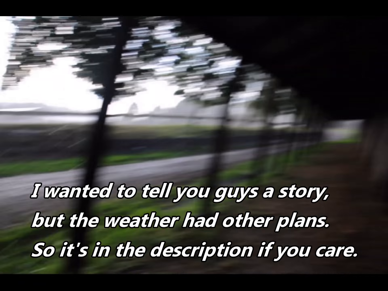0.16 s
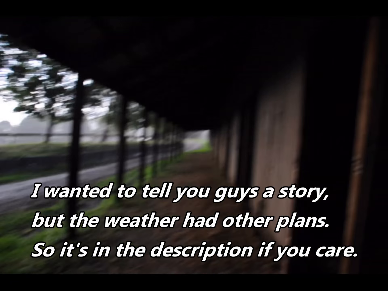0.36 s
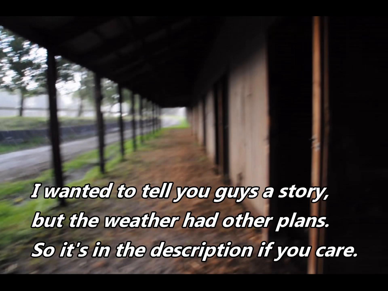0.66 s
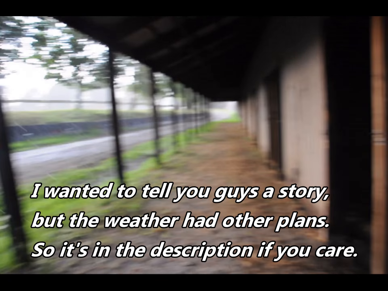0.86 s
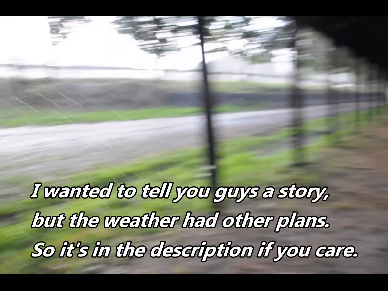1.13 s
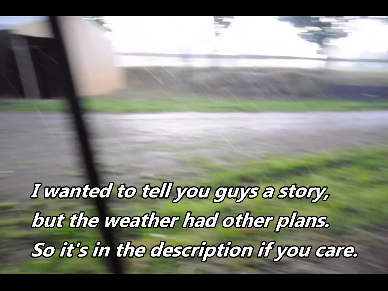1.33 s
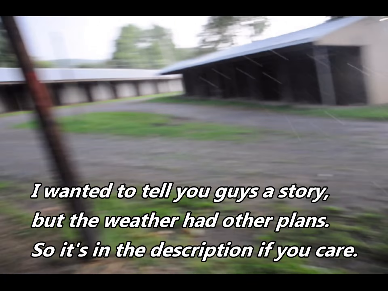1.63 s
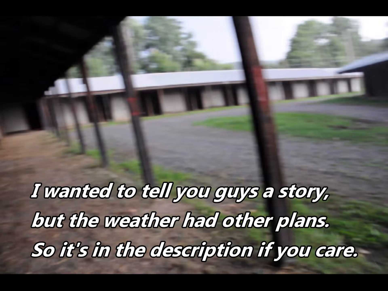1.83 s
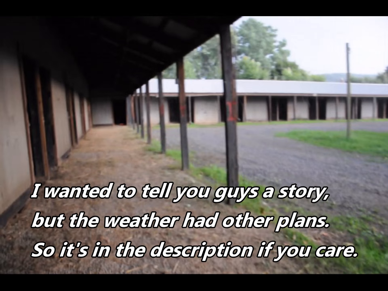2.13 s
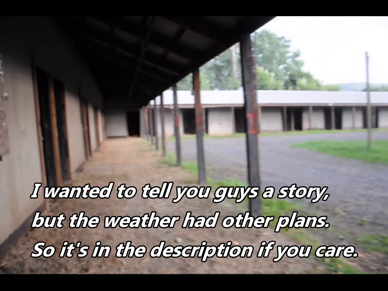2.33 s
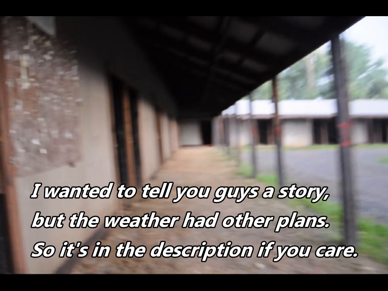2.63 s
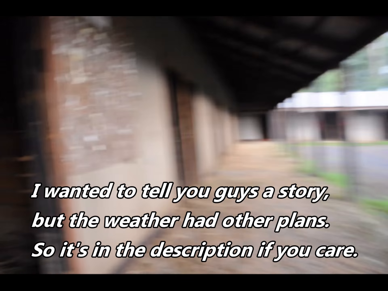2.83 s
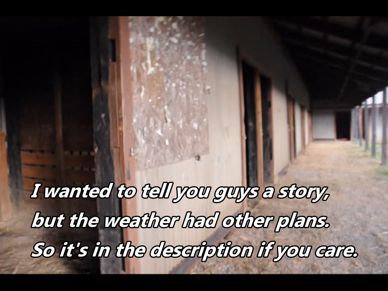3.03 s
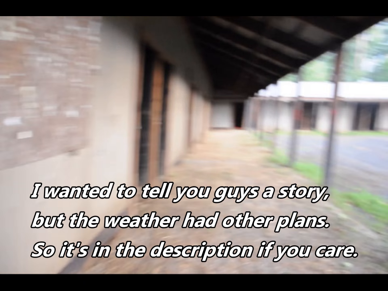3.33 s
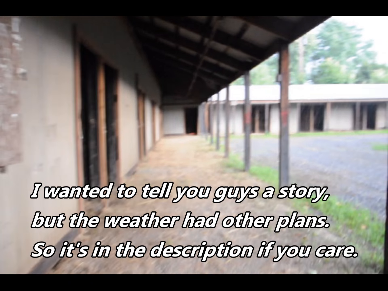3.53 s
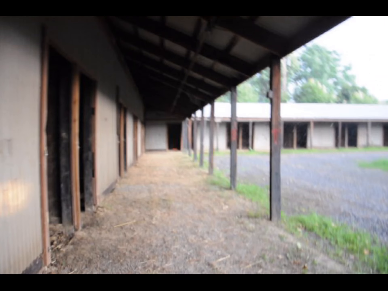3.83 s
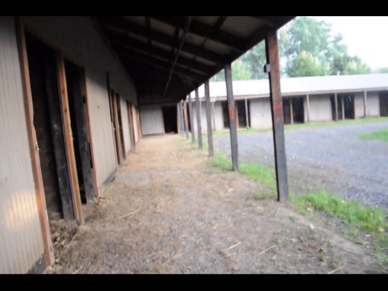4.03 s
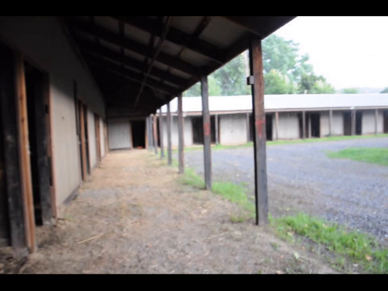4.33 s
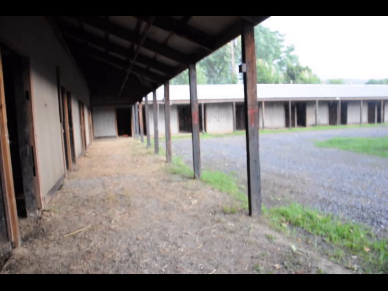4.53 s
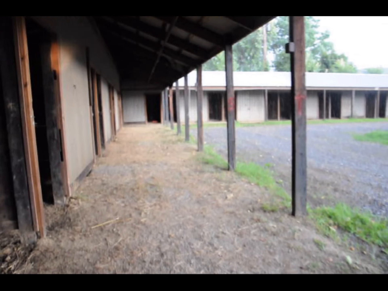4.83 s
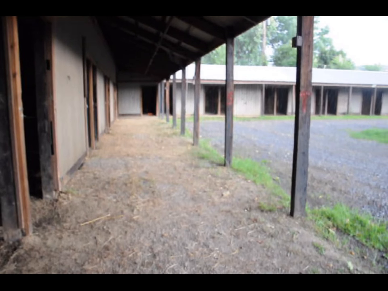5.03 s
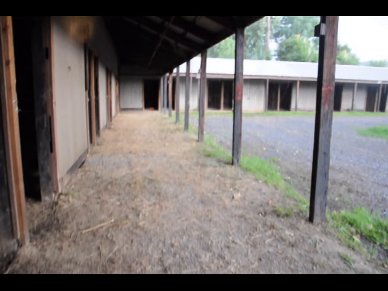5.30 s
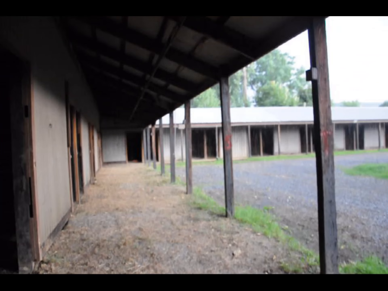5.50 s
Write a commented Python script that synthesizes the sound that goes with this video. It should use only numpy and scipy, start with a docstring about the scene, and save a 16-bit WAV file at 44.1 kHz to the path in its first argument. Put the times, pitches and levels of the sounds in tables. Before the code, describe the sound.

Heavy rain drums on a sheet-metal roof in a dense, loud, steady roar, with knocking drops and wet run-off spattering on the ground nearby.

```python
"""Under the sheet-metal roof of an open shed row, in heavy rain.
Dense random impacts drum the sheets into a roar over a low boom of air; single drops knock as damped modes.
Run-off spatters on the ground by the eaves as filtered noise, with heavier splats as short bursts of spray.
Slow sampling, softly smoothed, mirrors the treble above half its rate."""
import sys
import numpy as np
from scipy import signal
from scipy.fft import rfft, irfft, next_fast_len
from scipy.io import wavfile
from scipy.ndimage import uniform_filter1d, map_coordinates

SR = 44100
rng = np.random.default_rng(int(sys.argv[2]) if len(sys.argv) > 2 else 0)


def output_pcm(signal):
    """Save a mono or channel-first signal as 16-bit PCM at the path in sys.argv[1].

    Samples are clipped to [-1, 1] before scaling.
    """
    pcm = np.clip(np.atleast_2d(signal).T, -1, 1) * 32767
    wavfile.write(sys.argv[1], SR, np.round(pcm).astype(np.int16))


N = 249606  # length in samples


def amp(db):
    """Decibel law: amplitude ratio of a level in dB."""
    return 10 ** (np.asarray(db) / 20)


def unit(x):
    """Normalisation to an rms of one."""
    return x / np.sqrt(np.mean(x ** 2) + 1e-20)


def along(points, hz):
    """Interpolation of (frequency, value) points on a logarithmic frequency axis."""
    point_hz, value = np.transpose(points)
    return np.interp(np.log(hz + 1), np.log(point_hz + 1), value)


def curves(rows):
    """Linear interpolation in time: one value per sample for each column after start_s."""
    start_s, *columns = np.transpose(rows)
    return [np.interp(np.arange(N) / SR, start_s, column) for column in columns]


def wobble(rate_hz):
    """Band-limited fluctuation: a smooth curve through rate_hz random knots a second."""
    knots = rng.standard_normal(N // 100)
    return map_coordinates(knots, [np.arange(N) * rate_hz / SR])


def filtered(x, response):
    """Linear filtering: the spectrum is multiplied by a response of frequency."""
    padded = next_fast_len(N + SR // 2)
    hz = np.fft.rfftfreq(padded, 1 / SR)
    return irfft(rfft(x, padded) * response(hz), padded)[..., :N]


def coloured(x, spectrum):
    """Spectral shaping by a source's frequency response, at unit rms."""
    return unit(filtered(x, lambda hz: amp(along(spectrum, hz))))


def patchy(x, depth_db):
    """Uneven excitation: random gain in patches of time and pitch, as some sheets get more rain."""
    z = signal.stft(x, nperseg=512)[2]
    field = uniform_filter1d(rng.standard_normal(z.shape), size=5, axis=0)  # over pitch
    field = uniform_filter1d(field, size=8, axis=1)  # over time
    return signal.istft(z * amp(depth_db * unit(field)), nperseg=512)[1][:N]


RAREST = .004  # drops have a largest size, reached by this share of them


def drop_db(size, spread_db):
    """Power-law size distribution: few drops are large, and the largest size is capped."""
    return -spread_db * np.log(np.maximum(size, RAREST))


def drops(count, spread_db, ring_s, wash):
    """Shot noise: unequal random impacts ring as decaying noise, over the steady wash of far drops."""
    when, size = rng.random((count, 2)).T
    impacts = np.bincount((when * N).astype(int), amp(2 * drop_db(size, spread_db)), N)
    t = np.arange(SR // 8) / SR
    decay = amp(-120 * t / ring_s)  # energy falls 60 dB in ring_s
    energy = np.abs(signal.fftconvolve(impacts, decay)[:N])
    share = np.clip(wash, 0, 1)
    envelope = np.sqrt(share + (1 - share) * energy / energy.mean())
    return envelope * rng.standard_normal(N)


# Response of the air under the roof: frequency_hz [Hz], level_db [dB, relative]
AIR_RESPONSE = [(20, -33), (57, -31), (70, -21), (80, -21), (100, -15), (190, -3.5), (270, -3.5),
                (370, 0.5), (600, -4), (1000, -17.5), (2000, -50)]


def boom():
    """Cavity response: the air under the roof shapes broad noise into a low boom."""
    return coloured(patchy(rng.standard_normal(N), depth_db=1.1), AIR_RESPONSE)


# Response of the struck sheets: frequency_hz [Hz], level_db [dB, relative]
SHEET_RESPONSE = [(200, -47.5), (500, -10), (640, -8.5), (740, -1.5), (1000, -2.5), (1430, -2.5),
                  (1650, -4), (2000, -4.5), (2800, -9), (4000, -17), (6000, -38.5)]


def drumming():
    """Superposed plate impacts: dense drops excite the sheets and merge into a roar."""
    impacts = drops(count=4000, spread_db=2.0, ring_s=0.062, wash=0.69)
    return coloured(patchy(impacts, depth_db=0.65), SHEET_RESPONSE)


# Bare impact of a near drop: frequency_hz [Hz], level_db [dB, relative]
TICK_SPECTRUM = [(400, -24), (900, 3.5), (1500, 1), (2500, -4), (4000, -4), (5600, -12.5)]


def ticks():
    """Impulsive contact: near drops give very short broadband clicks."""
    return coloured(drops(count=6000, spread_db=1.4, ring_s=.004, wash=0.056), TICK_SPECTRUM)


KNOCK_T60_S, KNOCK_RISE_S = .05, 0.0027  # 60 dB decay time, rise time constant
KNOCK_MODES, KNOCK_SCATTER = 3, .1  # modes per knock, their relative scatter in pitch


def ring_sheet(start_s, level_db, pitch_hz):
    """Modal decay: each drop sets a patch of sheet ringing briefly in a few close, clashing modes."""
    t = np.arange(SR // 25) / SR
    shape = amp(-60 * t / KNOCK_T60_S) * (1 - np.exp(-t / KNOCK_RISE_S))
    scatter = KNOCK_SCATTER * rng.standard_normal((len(pitch_hz), KNOCK_MODES))
    modes_hz = pitch_hz[:, None] * (1 + scatter)
    ring = sum(np.sin(2 * np.pi * mode[:, None] * t) for mode in modes_hz.T) / np.sqrt(KNOCK_MODES)
    struck = amp(level_db)[:, None] * shape / shape.max() * ring
    at = (start_s * SR).astype(int)[:, None] + np.arange(len(t))
    return np.bincount(at.ravel(), struck.ravel(), N + SR)[:N]


PATTER_HZ, PATTER_OCTAVES, PATTER_SPREAD_DB = 1020.3, 0.3286, 1  # usual pitch, its scatter, spread of size


def patter(count):
    """Random modal excitation: the nearest sheets knock at random times and pitches."""
    when, size = rng.random((count, 2)).T
    pitch_hz = PATTER_HZ * 2 ** (PATTER_OCTAVES * rng.standard_normal(count))
    return unit(ring_sheet(when * N / SR, drop_db(size, PATTER_SPREAD_DB), pitch_hz))


# Drops on wet ground: frequency_hz [Hz], level_db [dB, relative]
GROUND_SPECTRUM = [(800, -34.5), (2000, -8.5), (2800, -7.5), (3150, 0.5), (4000, -3), (5000, -6.5),
                   (5600, -13)]


def spatter():
    """Liquid impact noise: run-off strikes the wet ground as short, bright grains."""
    impacts = drops(count=9000, spread_db=2.5, ring_s=0.012, wash=0.6)
    return coloured(patchy(impacts, depth_db=0.5), GROUND_SPECTRUM)


# Slow levels of the shower: start_s [s], boom_db [dB], drumming_db [dB], patter_db [dB], spatter_db [dB]
SHOWER_LEVELS = [(0, -26.5, -25, -30, -25.5), (.15, -31.5, -24, -31, -29), (.4, -29, -24.5, -30, -27),
                 (.6, -30.5, -24.5, -32.5, -28.5), (.8, -28, -24, -29, -27.5),
                 (1.2, -30.5, -24, -29.5, -29), (1.45, -29.5, -23.5, -28.5, -29.5),
                 (1.65, -28, -23.5, -29.5, -28), (1.9, -30.5, -23, -26.5, -28.5),
                 (2.25, -29, -25.5, -27.5, -29), (2.5, -29.5, -24, -31, -29),
                 (2.72, -28, -23.5, -29.5, -30), (3.05, -30, -26, -29.5, -28.5),
                 (3.22, -29, -23.5, -29.5, -28), (3.4, -28.5, -27, -29, -28.5), (3.6, -28.5, -25, -29, -28),
                 (3.95, -30.5, -24.5, -32, -28), (4.12, -29.5, -23.5, -33, -29), (4.3, -29, -23, -30, -28),
                 (4.65, -30.5, -24, -31.5, -29), (4.95, -29.5, -23, -32.5, -28),
                 (5.25, -28, -25.5, -28, -27.5), (5.66, -27.5, -23, -33.5, -28)]
# Depth of the shared surges: boom_db [dB], roof_db [dB], spatter_db [dB]; all per unit of random curve
# Depth of the spatter's own flurries: slow_db [dB], fast_db [dB]
SURGE_DB, FLURRY_DB = (-0.25, 0.5, 0.48), (0.15, 0.98)
TICK_DB = -7.5  # relative to the drumming


def rain():
    """Correlated modulation: one surge lifts roof and spatter together and slightly lowers the boom."""
    boom_db, drumming_db, patter_db, spatter_db = curves(SHOWER_LEVELS)
    surge = wobble(14)
    boom_surge, roof_surge, spatter_surge = [depth_db * surge for depth_db in SURGE_DB]
    flurry = FLURRY_DB[0] * wobble(5.8) + FLURRY_DB[1] * wobble(30)
    roar = drumming() + amp(TICK_DB) * ticks()
    return (amp(boom_db + boom_surge) * boom()
            + amp(drumming_db + roof_surge) * roar
            + amp(patter_db + roof_surge) * patter(count=2500)
            + amp(spatter_db + spatter_surge + flurry) * spatter())


# Heavy splats of run-off: start_s [s], level_db [dB, loudest rms], t60_s [s]
SPLAT_EVENTS = [(0.0256, -16.5, 0.043), (0.13, -26.5, 0.045), (0.155, -22, .02), (0.178, -21.5, 0.044),
                (0.2256, -20, 0.036), (0.286, -18, .03), (0.322, -22, .04), (0.5035, -16.5, 0.035),
                (0.633, -16.5, .022), (0.884, -21, 0.08), (1.11, -23, 0.028), (1.2468, -24.5, .04),
                (1.334, -21.5, 0.034), (1.441, -21.5, .04), (2.1274, -25.5, 0.033), (2.691, -20, 0.069),
                (2.884, -22.5, .04), (3.24, -23, .05), (3.828, -22.5, 0.047), (3.893, -18.5, 0.058),
                (3.977, -20, .06), (4.095, -19.5, 0.045), (4.3003, -20, 0.036), (4.376, -23.5, 0.035),
                (4.806, -22, 0.044), (4.879, -22, .06), (5.428, -21, .04)]
# A splat's spray: frequency_hz [Hz], level_db [dB, relative]
SPRAY_SPECTRUM = [(1200, -31), (2200, -11), (3100, -3), (3700, -2), (4500, -6), (5500, -10.5)]
SPLAT_RISE_S = 0.0016  # time constant


def splats():
    """Transient noise burst: larger blobs of run-off throw spray that rises fast and decays."""
    out, t = np.zeros(N + SR), np.arange(SR // 8) / SR
    spray = np.tile(coloured(rng.standard_normal(N), SPRAY_SPECTRUM), 2)
    for start_s, level_db, t60_s in SPLAT_EVENTS:
        shape = amp(-60 * t / t60_s) * (1 - np.exp(-t / SPLAT_RISE_S))
        span = slice(round(start_s * SR), round(start_s * SR) + len(t))
        out[span] += amp(level_db) * shape / shape.max() * spray[span]
    return out[:N]


# Fat drops on the sheet overhead: start_s [s], level_db [dB, envelope peak], pitch_hz [Hz, centre of modes]
KNOCK_EVENTS = [(0.319, -20.5, 1200), (0.634, -22.5, 890), (0.95, -18, 1023), (1.342, -23, 1887),
                (1.652, -18, 807), (2.051, -25, 943), (2.181, -21, 1945), (2.238, -21, 1760),
                (2.34, -17.5, 940), (2.455, -23, 1030), (2.695, -21, 1150), (2.745, -20, 1330),
                (2.862, -21, 495), (2.895, -22, 954), (3.198, -24.5, 2040), (3.378, -24, 2060),
                (3.598, -23, 916), (3.701, -18.5, 965), (3.911, -18, 1343), (3.975, -20, 1000),
                (4.165, -23.5, 780), (4.793, -25.5, 975), (5.088, -18, 862), (5.171, -19.5, 1965),
                (5.503, -21, 930)]


def knocks():
    """Modal excitation by single fat drops on the sheet overhead."""
    return ring_sheet(*np.transpose(KNOCK_EVENTS))


def scene():
    """Linear superposition of rain, splats and knocks in one channel."""
    return (rain() + splats() + knocks())[None]


# Smoothing after sampling, with its side lobes: frequency_hz [Hz], gain_db [dB]
SMOOTHING = [(5500, 0), (6000, -5.5), (6500, -11.5), (7000, -19.5), (7500, -28.5), (8000, -42),
             (8400, -59.5), (8800, -61), (9200, -69.5), (9800, -66), (10400, -71), (12000, -69.5),
             (15000, -71.5)]
SLOWER, TOP_HZ = 4, 15700  # sampling slowdown (ratio), upper cutoff in Hz


def record(dry):
    """Spectral imaging: sampling at a quarter of the rate mirrors the treble; soft smoothing lets it through."""
    limited = filtered(dry, lambda hz: hz < SR / SLOWER / 2)
    sampled = limited * SLOWER * (np.arange(N) % SLOWER == 0)  # zeros between the samples
    return filtered(sampled, lambda hz: amp(along(SMOOTHING, hz)) * (hz < TOP_HZ))


dry = scene()
out = record(dry)
output_pcm(out)
```